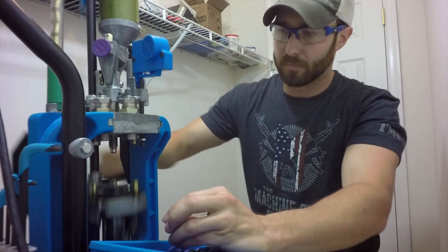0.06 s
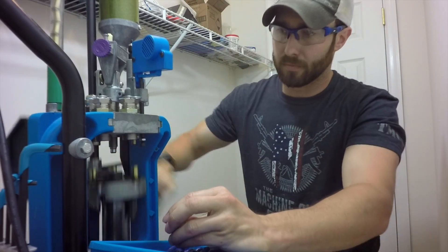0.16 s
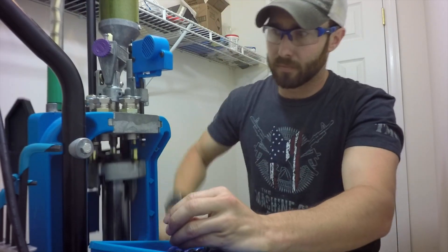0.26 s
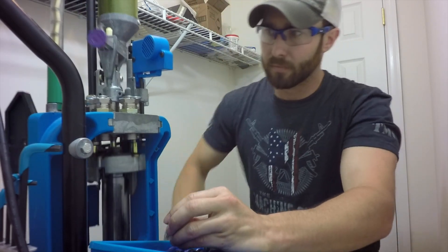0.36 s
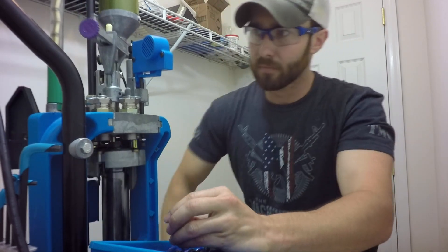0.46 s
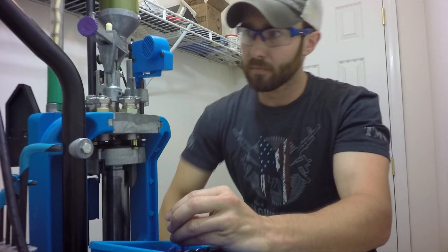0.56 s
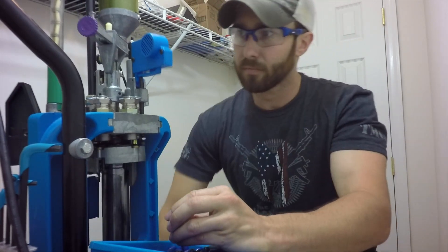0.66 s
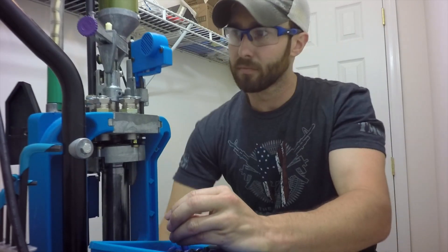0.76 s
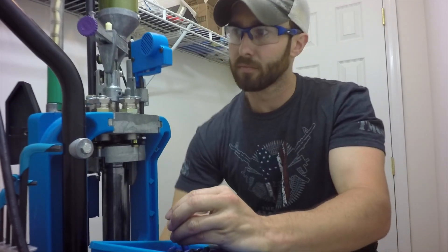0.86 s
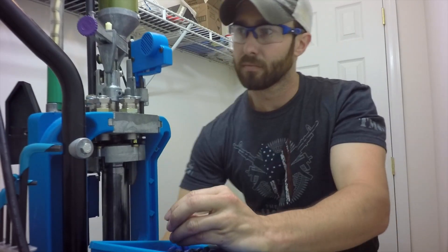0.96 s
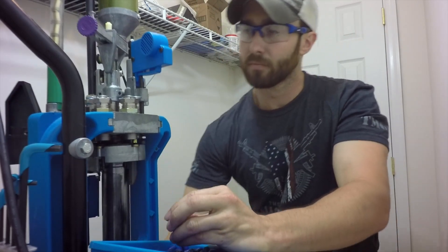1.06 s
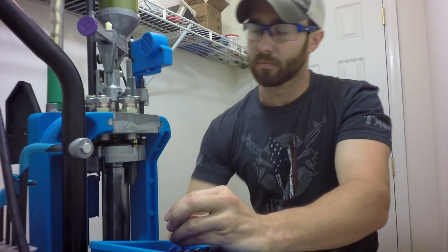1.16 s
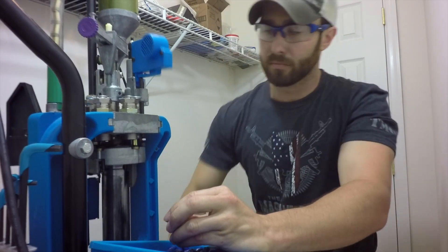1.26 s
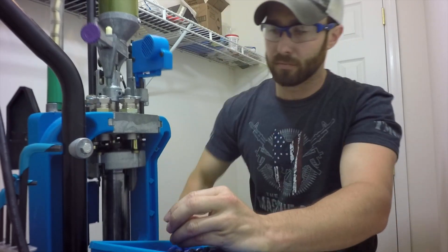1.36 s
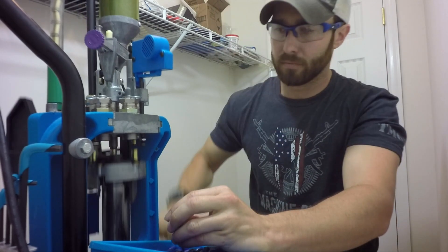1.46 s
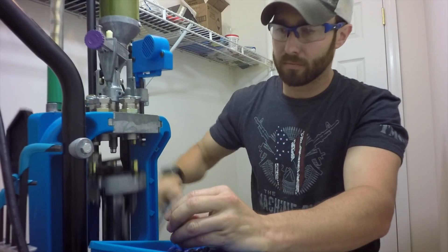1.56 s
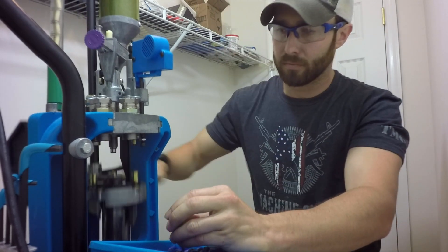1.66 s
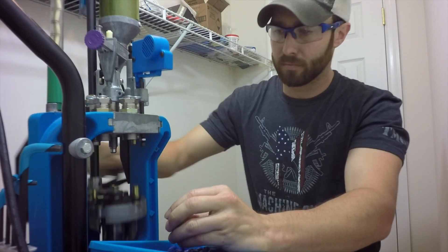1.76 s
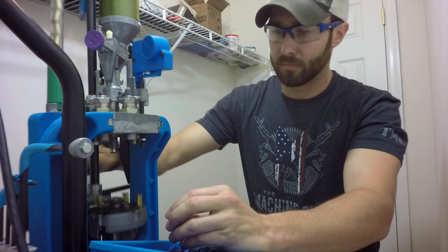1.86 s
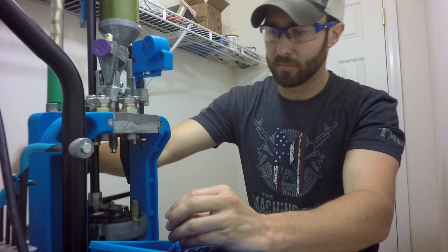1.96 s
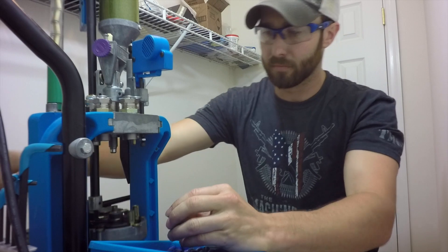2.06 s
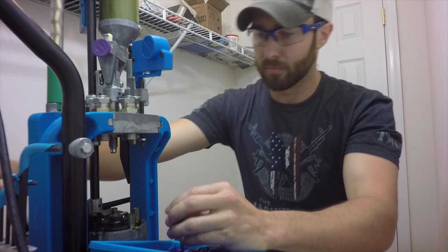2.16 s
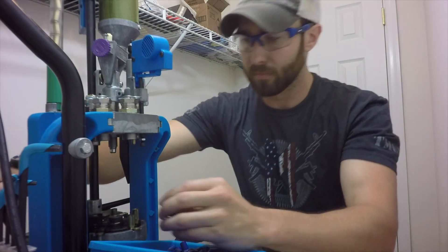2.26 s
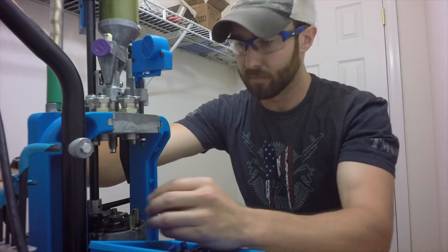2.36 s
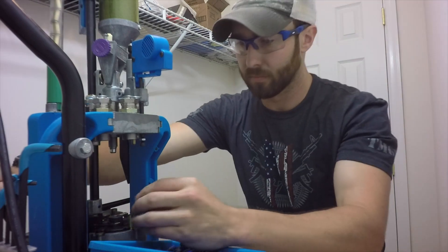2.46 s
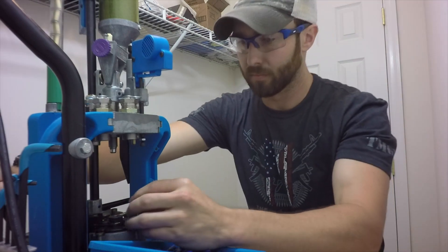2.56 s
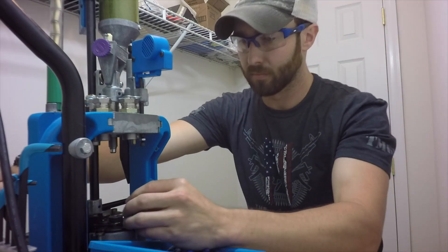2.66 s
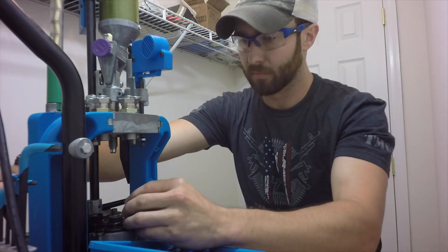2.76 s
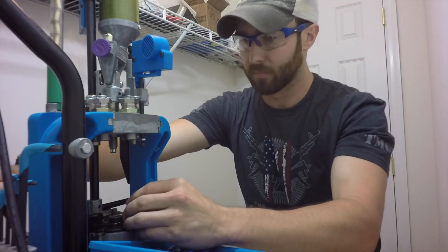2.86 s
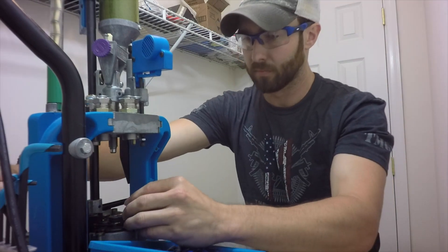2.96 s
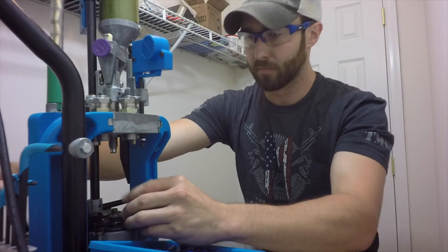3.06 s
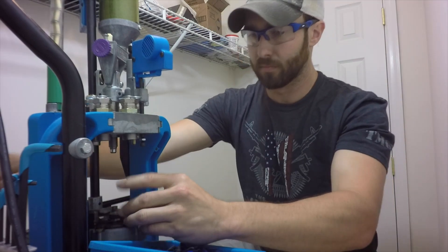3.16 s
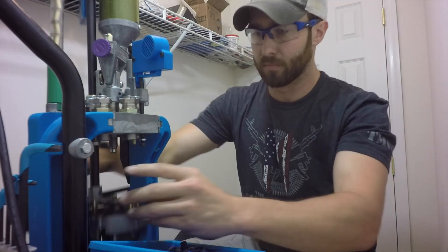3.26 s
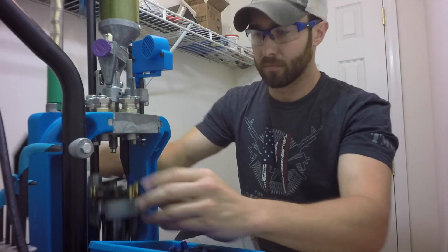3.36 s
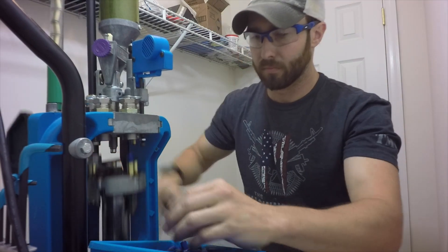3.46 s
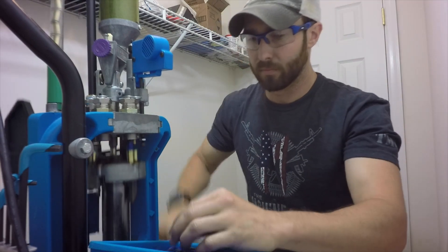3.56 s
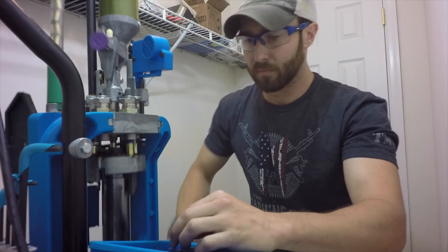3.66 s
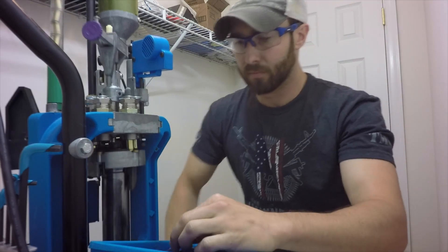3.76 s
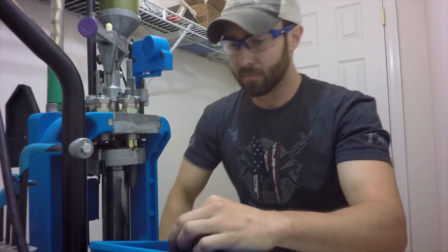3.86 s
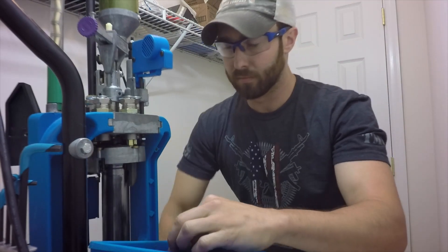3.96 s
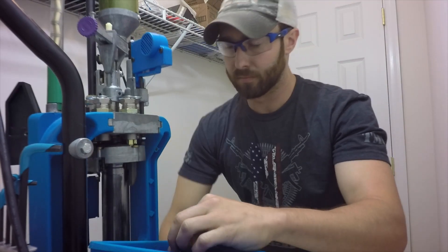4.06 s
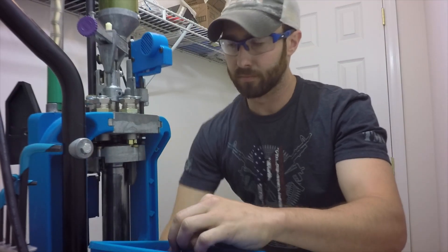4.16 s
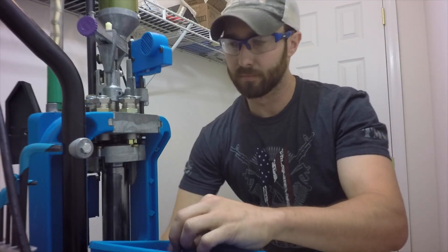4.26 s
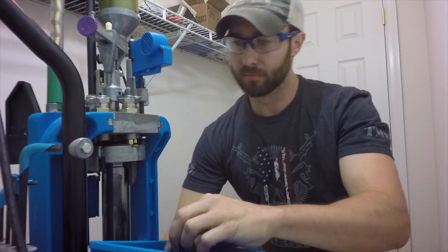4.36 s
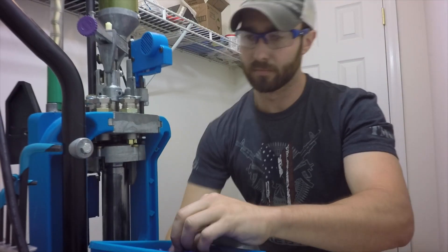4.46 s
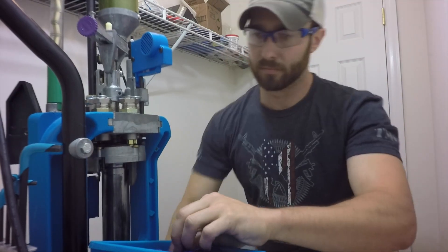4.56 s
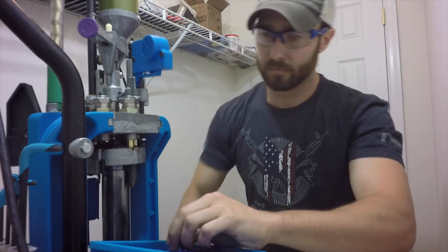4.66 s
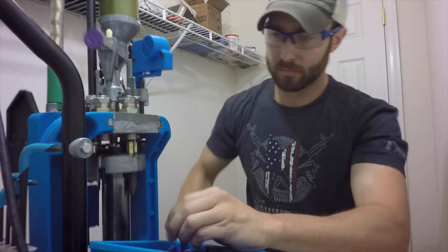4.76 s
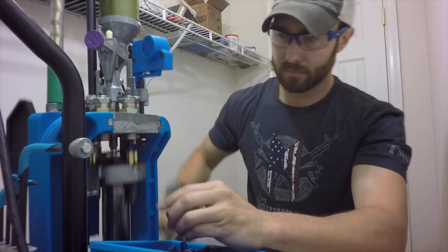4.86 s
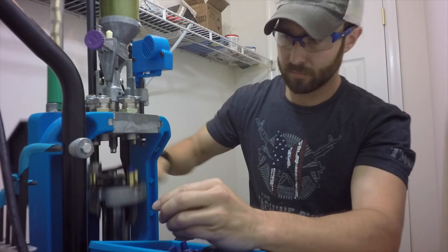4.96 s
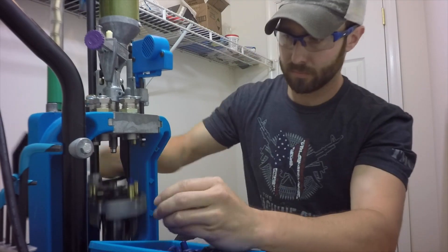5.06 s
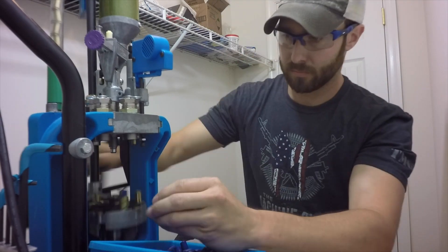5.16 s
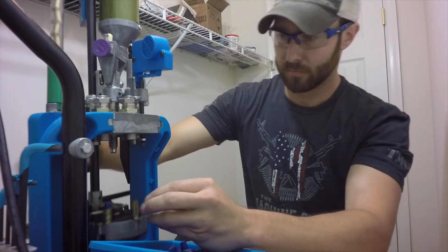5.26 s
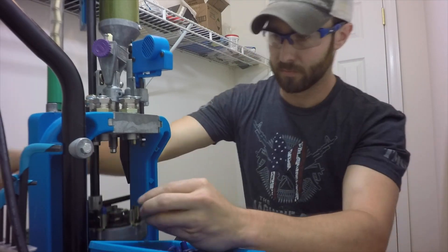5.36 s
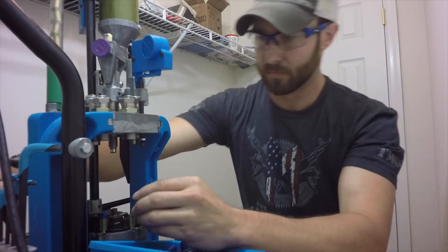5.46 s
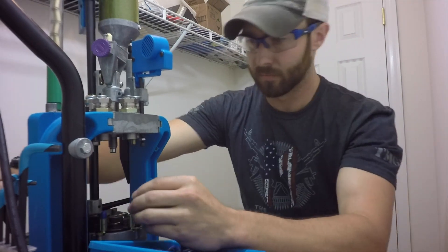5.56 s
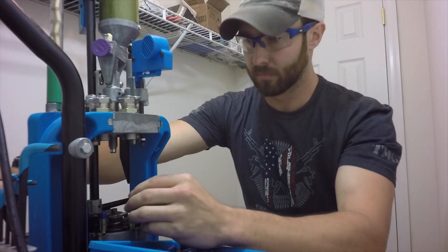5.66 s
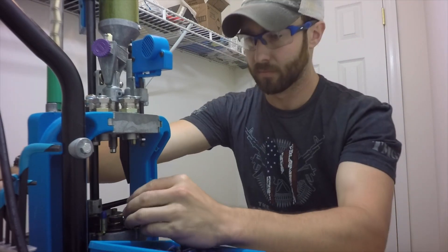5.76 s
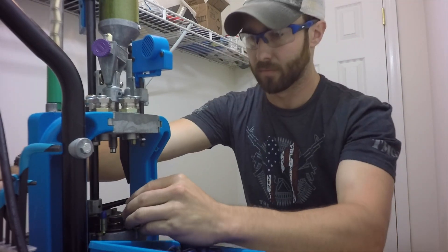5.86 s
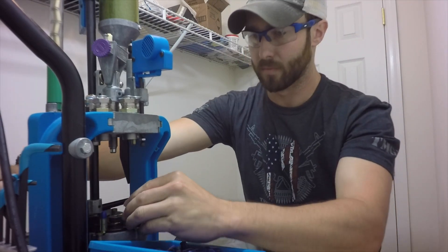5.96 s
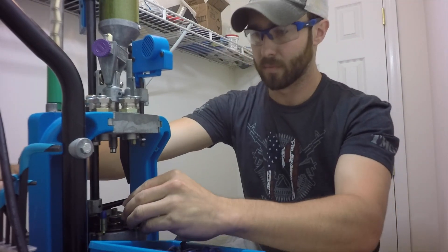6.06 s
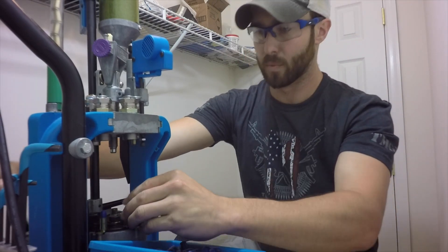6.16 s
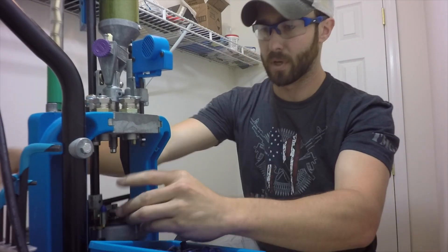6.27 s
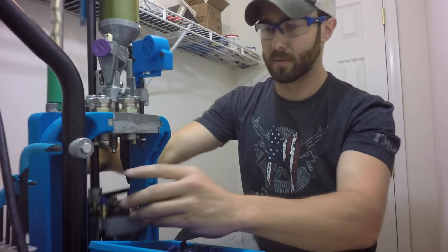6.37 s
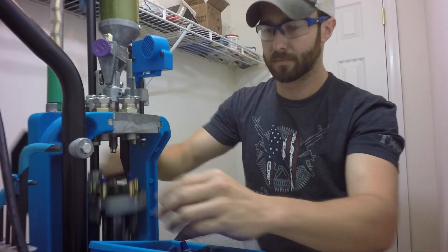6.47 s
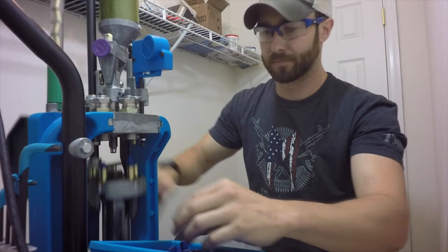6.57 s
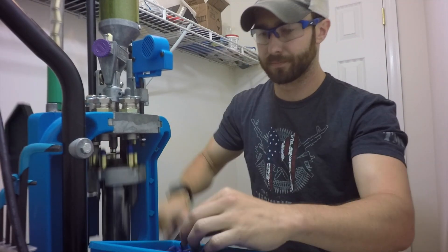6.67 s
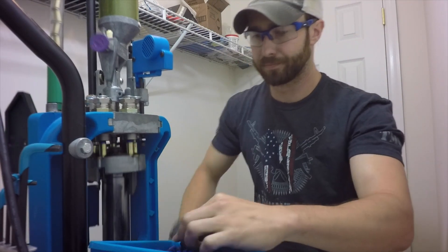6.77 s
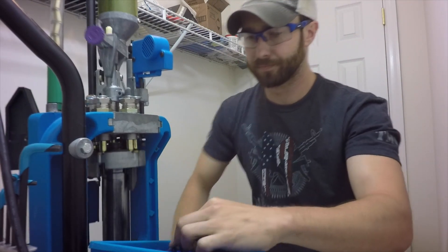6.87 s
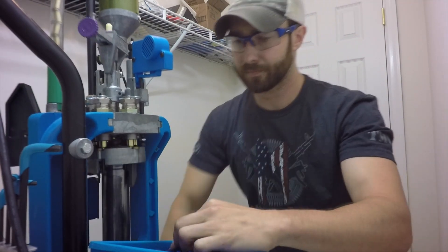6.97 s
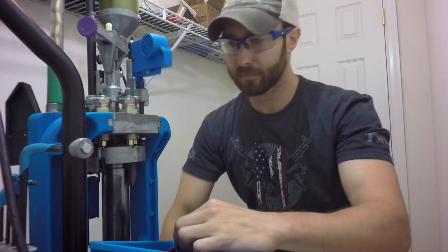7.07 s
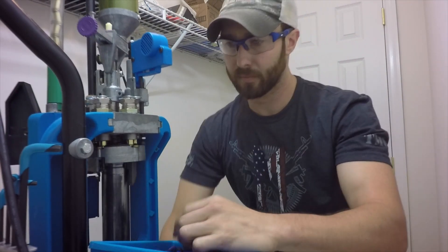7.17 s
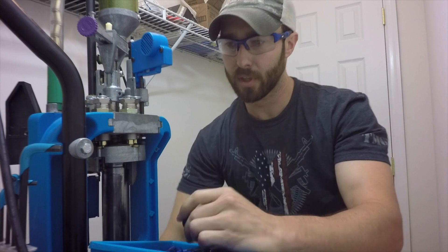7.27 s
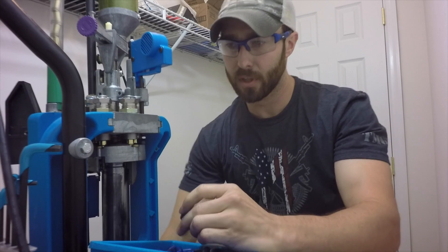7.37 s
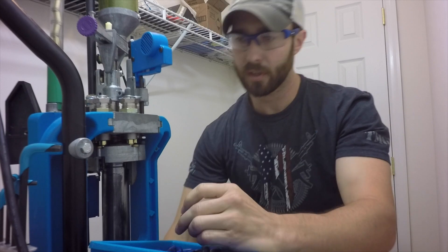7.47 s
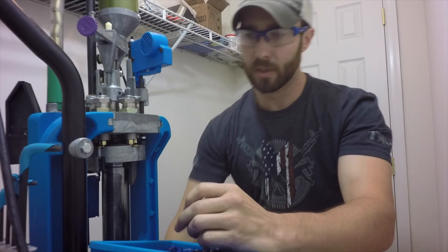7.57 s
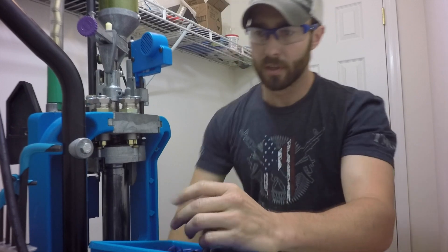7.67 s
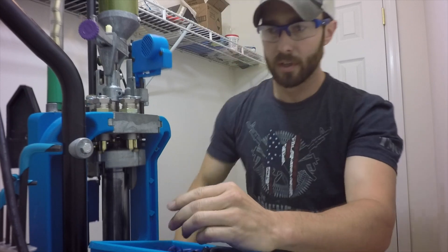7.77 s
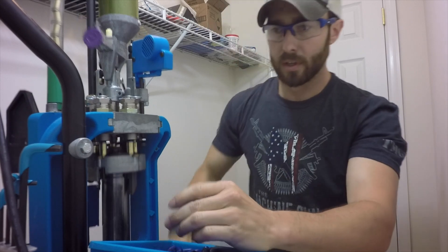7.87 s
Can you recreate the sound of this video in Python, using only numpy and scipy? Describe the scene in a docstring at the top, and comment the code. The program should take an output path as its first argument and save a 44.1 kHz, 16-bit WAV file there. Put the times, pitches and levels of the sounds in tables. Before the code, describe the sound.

Bursts of heavy metallic clunks and bright brass jingles come from a lever press, separated by quiet pauses with faint fingering ticks and background air.

```python
"""In a small room a hand-worked reloading press is cycled on a wooden bench, the microphone standing on the bench.
Each stop, latch and falling case is a blow: steel clacks, the cast frame rings, the bench thuds and sways.
Rings are decaying modes, and blurred clatter is shaped noise. Brass parts ring on in the treble.
Between the blows the ram slides and rattles over faint background air."""
import sys
import numpy as np
from scipy import signal
from scipy.fft import rfft, irfft
from scipy.io import wavfile
from scipy.ndimage import uniform_filter1d

SR = 44100
rng = np.random.default_rng(int(sys.argv[2]) if len(sys.argv) > 2 else 0)


def generate_wav(sig):
    """Save sig (samples, or channels by samples) to the path in sys.argv[1] as 16-bit PCM at SR."""
    pcm = np.round(np.clip(np.atleast_2d(sig).T, -1, 1) * 32767).astype(np.int16)
    wavfile.write(sys.argv[1], SR, pcm)


N = 348371
T = np.arange(SR // 2) / SR  # the half second given to each struck sound (s)

# Spectrum of the press as heard on the bench. Each row: frequency in Hz, relative level in dB per Hz.
PRESS_COLOUR = [(24, -35.5), (40, 14), (117, -6.5), (213, -8.5), (333, -13.5), (509, -3), (637, -10),
                (881, -7.5), (1560, -21.5), (2160, -13.5), (2510, -19), (8110, -26.5), (10400, -36.5),
                (12100, -38), (15500, -38)]


def undb(db):
    """Amplitude factor of a level in dB."""
    return 10 ** (np.asarray(db) / 20)


def unit(x):
    """Scale to rms 1."""
    return x / np.sqrt(np.mean(x ** 2))


def fade(t60):
    """Exponential decay by 60 dB in t60 seconds."""
    return np.exp(-np.log(1000) * T / t60)


def noise(shape, lo_hz, hi_hz, size=N):
    """Noise of a (Hz, dB) spectrum between two soft edges, rms 1."""
    f = np.maximum(np.fft.rfftfreq(size, 1 / SR), 1)
    hz, db = np.transpose(shape)
    edges = 1 / (1 + (lo_hz / f) ** 8) / (1 + (f / hi_hz) ** 8)
    colour = undb(np.interp(np.log(f), np.log(hz), db))
    white = rfft(rng.standard_normal(size))
    return unit(irfft(white * colour * edges, size))


def walk(rate):
    """Random levels drawn every 1 / rate s, with straight slews between them; spread near 1."""
    k = int(SR / rate)
    held = np.repeat(rng.standard_normal(N // k + 1), k)
    return uniform_filter1d(held, k)[:N]


def grit(rate, spread_db, knock_s, steady):
    """Envelope of uneven knocks over a steady part: a few strong among many weak, each dying quickly."""
    size = np.minimum(rng.exponential(size=N), 3)
    knocks = (rng.random(N) < rate / SR) * undb(spread_db * size)
    dying = signal.lfilter([1], [1, -np.exp(-1 / (knock_s * SR))], knocks)
    return unit(dying + steady)


def loose_parts():
    """Each loose part ticks at its own random moments and rings briefly at its own pitch."""
    # Loose parts of the press. Each row: pitch in Hz, t60 in s.
    parts = [(1800, .03), (2200, .025), (2900, .025), (3700, .025), (4300, .02), (5300, .02), (6600, .015),
             (8100, .015)]
    ticks_per_s, tilt_db_per_oct = 45, -7.5
    out = 0
    for hz, t60 in parts:
        ticks = (rng.random(N) < ticks_per_s / SR) * rng.standard_normal(N)
        r = np.exp(-np.log(1000) / (t60 * SR))
        ring = signal.lfilter([1], [1, -2 * r * np.cos(2 * np.pi * hz / SR), r * r], ticks)
        out = out + undb(tilt_db_per_oct * np.log2(hz / parts[0][0])) * unit(ring)
    return unit(out)


def stroke():
    """The pull on the handle rocks the bench; the ram drags and loose parts rattle."""
    # Shoves that start the bench swaying. Each row: time in s, sway in dB, dying in dB per s.
    shoves = [(0.0, -25, 32), (0.33, -28, 20), (0.93, -17.5, 35), (1.3, -24.5, 18), (1.5, -21, 40),
              (1.87, -28.5, 10), (2.3, -27, 60), (3.3, -36, 42), (3.55, -27, 28), (4.27, -23, 18),
              (4.67, -21.5, 8), (5.2, -28, 10), (5.55, -21, 72), (6.3, -34, 10), (6.7, -28, 46),
              (7.05, -26.5, 28), (7.33, -19, 33), (2.0, -26.5, 19.5), (4.85, -26, 88), (7.71, -29, 8)]
    # Each time the ram is moved. Each row: start in s, end in s, then the levels in dB of the
    # bench rumble, frame hum and slide rattle.
    pulls = [(0.0, 0.215, -27.5, -35.5, -38.5), (0.298, 0.51, -22.5, -24.5, -36.5),
             (0.956, 1.162, -34.5, -46, -48), (1.302, 1.597, -22, -26, -40), (1.627, 2.05, -29, -31.5, -38),
             (2.1, 2.36, -31.5, -40.5, -47), (3.282, 3.553, -34, -37.5, -43),
             (3.612, 3.86, -25.5, -29.5, -42), (4.32, 4.45, -35, -33, -40),
             (4.683, 4.947, -26.5, -27.5, -38), (4.998, 5.247, -31, -31, -37.5),
             (5.305, 5.56, -25.5, -31, -40), (6.334, 6.755, -32.5, -35.5, -47.5),
             (6.82, 7.024, -24, -25.5, -35.5), (7.354, 7.46, -43, -38, -40), (7.76, 7.9, -28, -26.5, -36.5)]
    # While the ram stands: rumble, hum and rattle in dB.
    standing_db = [-49.5, -55, -64.5]
    sway_hz, sway_waver_db = 27.3, 2.5
    shove_attack, pull_attack, pull_release = 900, 298, 79  # dB per s
    sway_rest_db, loose_db = -41, -6
    t = np.arange(N) / SR

    at, shove_db, dying = np.transpose(shoves)[:, :, None]
    sway_db = shove_db - shove_attack * np.maximum(at - t, 0) - np.abs(dying) * np.maximum(t - at, 0)
    sway_db = np.maximum(sway_db.max(axis=0), sway_rest_db)
    sway_db = sway_db + sway_waver_db * walk(7.4)
    wandering_hz = sway_hz * (1 + 0.055 * walk(3.0))
    sway = np.sqrt(2) * np.sin(2 * np.pi * np.cumsum(wandering_hz) / SR)

    # each pull rises fast, holds, and dies away after the ram stops
    start, end, *levels = np.transpose(pulls)[:, :, None]
    down_db = pull_attack * np.maximum(start - t, 0) + pull_release * np.maximum(t - end, 0)
    rumble_db, hum_db, rattle_db = (np.maximum((db - down_db).max(axis=0), rest)
                                    for db, rest in zip(levels, standing_db))
    rumble = undb(1 * walk(29)) * noise(PRESS_COLOUR, 59.0, 402)
    hum = undb(3.5 * walk(30)) * noise(PRESS_COLOUR, 380, 1300)
    rattle = grit(120, 1.2, 0.0095, 0.22) * noise(PRESS_COLOUR, 1020, 6000)
    bright = grit(73, 2.1, 0.0018, 1.9) * noise(PRESS_COLOUR, 3800, 16000)
    rattle = rattle + undb(-8.5) * bright + undb(loose_db) * loose_parts()
    return undb(sway_db) * sway + undb(rumble_db) * rumble + undb(hum_db) * hum + undb(rattle_db) * rattle


def background_air():
    """Steady background noise, strongest in the bass."""
    # Spectrum of the background. Each row: frequency in Hz, relative level in dB per Hz.
    air_colour = [(18, -33), (30, -12.5), (140, 10.5), (332, -63), (852, -35.5), (1590, -28.5),
                  (4090, -38.5), (10700, -39), (15500, -50.5)]
    return undb(-46) * noise(air_colour, 25, 16000)


def struck(modes, count, scatter_db, push_s, lean_db=0):
    """One ring per blow, peak 1: each blow shares its force differently among the modes."""
    hz, db, t60 = np.transpose(modes)[:, :, None]
    decay = np.log(1000) * T / np.clip(t60, .03, 1)
    bank = np.exp(2j * np.pi * hz * T - decay) * undb(db)
    chance = rng.standard_normal((count, len(modes), 2))
    share = undb(scatter_db * chance[..., 0] + lean_db) * np.exp(.6j * chance[..., 1])
    rings = (share @ bank).imag
    rings = rings * (1 - np.exp(-T / push_s))  # a soft contact builds the ring up
    return rings / np.abs(rings).max(axis=1, keepdims=True)


def clinks(hz, spread, t60):
    """The small part that is hit rings on a few close, beating modes around its own pitch."""
    chance = rng.standard_normal((len(hz), 4, 2))
    pitch = np.minimum(hz[:, None] * (1 + spread * chance[..., 0]), .4 * SR)[..., None]
    modes = np.sin(2 * np.pi * pitch * T + chance[..., 1:]).sum(axis=1)
    return modes * fade(t60) * (1 - np.exp(-T / 0.00031)) / 3


def bursts(lo_hz, hi_hz, count, crack_t60, tail_t60, tail_db, push_s, chatter=1):
    """Modes too dense to tell apart: a crack and a longer tail of rebounds, a random stretch per blow."""
    dense = noise(PRESS_COLOUR, lo_hz, hi_hz)
    span = rng.integers(0, N - len(T), count)[:, None] + np.arange(len(T))
    tail = undb(tail_db) * fade(tail_t60) * (chatter * np.ones(N))[span]
    return dense[span] * (fade(crack_t60) + tail) * (1 - np.exp(-T / push_s)) / 2


def place(times, db, sounds):
    """Lay each sound at its time and level."""
    out = np.zeros(N + len(T))
    for s, gain, sound in zip(times, undb(db), sounds):
        i = int(s * SR)
        out[i:i + len(T)] += gain * sound
    return out[:N]


def strike_list(events, table):
    """Each event's time and levels, followed by the row of its contact."""
    return np.transpose([(s, *levels, *table[name]) for s, name, *levels in events])


def blows():
    """Steel and frame reach the microphone by air, the thud through the bench."""
    # Every blow. Each row: time in s, contact, strength in dB, extra steel in dB.
    hits = [(0.1181, "case seats", 2.5, 2.5), (0.2057, "cam", 5, 7.5), (0.2627, "cam", 0.5, 12),
            (0.3328, "die entry", 2.5, 0.5), (0.3584, "sizing", 0, -1), (0.4003, "rebound", -0.5, 4.5),
            (0.4583, "die entry", -10, 5), (0.4708, "slide bar", 1, -2), (0.5577, "ram top", 1.5, -1.5),
            (0.6618, "rebound", -4.5, 4), (0.9229, "handle stop", 2.5, -1),
            (0.9387, "handle bounce", 3.5, 2), (1.0163, "handle settles", 6.5, -1),
            (1.076, "handle settles", -16, 8), (1.237, "slack", -6.5, 0), (1.275, "pull free", 1.5, -4.5),
            (1.3472, "latch", 6.5, -1.5), (1.479, "die entry", 7, -3), (1.4946, "bar returns", -2.5, 1.5),
            (1.5492, "bar stop", 1.5, 1.5), (1.6794, "index", -2, 5), (1.728, "detent", -1.5, 10.5),
            (1.8554, "case drops", 0, -6.5), (1.943, "spring", -4, 6), (1.9815, "ram bottom", -1.5, 3),
            (2.0073, "plate lands", -2, 5), (2.105, "case rattles", 4.5, -2.5), (2.183, "cam", 1, -14),
            (2.2036, "pin", -5, 4.5), (2.2633, "tap", -3, 4.5), (2.3282, "rest", -4.5, -7),
            (2.548, "fingers", -0.5, -2.5), (2.63, "fingers", 0.5, 2), (2.731, "hand shifts", -11.5, 12),
            (2.8825, "case tinkles", 1, -1), (3.088, "fingers", -1.5, -16),
            (3.1307, "hand shifts", -7, 19.5), (3.2587, "take-up", -2.5, -0.5), (3.2874, "link", -1, -9),
            (3.3558, "link", 3.5, 2), (3.4269, "case seats", 3, -1.5), (3.5167, "cam", 2, 5.5),
            (3.5727, "cam", -4, 13), (3.6413, "die entry", -3, 2), (3.676, "sizing", 1.5, -2.5),
            (3.7397, "rebound", -4.5, 7), (3.7753, "slide bar", 5.5, -8.5), (3.8854, "ram top", 0, 1.5),
            (3.9651, "rebound", -5.5, 4.5), (4.0919, "pin pings", 2.5, -1),
            (4.2626, "handle stop", 1.5, -3), (4.2763, "handle bounce", -3.5, -0.5),
            (4.3206, "handle settles", 2, -0.5), (4.3882, "handle settles", -11, 11),
            (4.581, "fingers", 4, -3), (4.6094, "slack", 1.5, -0.5), (4.6365, "pull free", -1, 1),
            (4.6964, "latch", 0, 4), (4.7782, "cam", 6, -1), (4.8627, "bar returns", 0.5, -2),
            (4.9167, "bar stop", -4.5, 4.5), (5.034, "index", 0.5, 1), (5.0682, "detent", 2.5, 1),
            (5.1892, "case drops", -0.5, -4), (5.2682, "spring", -3, -2.5), (5.3059, "ram bottom", 3, -2),
            (5.333, "plate lands", 1.5, -1), (5.4165, "case rattles", -6.5, 5), (5.4886, "pin", 6.5, -1.5),
            (5.5326, "push", 1, 2), (5.5854, "rest", -6, -4), (5.7107, "fingers", 4.5, -2.5),
            (5.8693, "fingers", 2.5, 2.5), (6.0513, "fingers", 3.5, 6), (6.2195, "hand shifts", 6, -2),
            (6.3489, "take-up", 4, -6.5), (6.3799, "link", 1.5, 7.5), (6.4575, "link", -7, 14),
            (6.5315, "case seats", -3.5, 5), (6.6232, "cam", 0, 8.5), (6.6813, "cam", -4.5, 13.5),
            (6.757, "die entry", -1, 1), (6.778, "die entry", -2.5, 0.5), (6.8132, "sizing", 0, -7.5),
            (6.8964, "slide bar", 3, 1.5), (6.9593, "take-up", 7, -10), (6.9695, "ram top", 0.5, 0),
            (7.0754, "rebound", -7, 3.5), (7.259, "case tinkles", -16, 11.5),
            (7.3204, "handle stop", 0.5, 11), (7.399, "latch", -8.5, 11),
            (7.4794, "handle settles", -4.5, -6), (7.5772, "cam", -12, -9), (7.64, "fingers", 12, -5),
            (7.667, "slack", 0, 1.5), (7.7068, "pull free", -2, 0), (7.7545, "push", 11.5, -8)]
    # What each contact sets going, before the strength is added: clack, bright tick, frame and
    # bench thud in dB, clack pitch in Hz, grip damping in dB per 0.1 s (negative rings longer).
    contacts = {"take-up": (-31.5, -21.5, -24, -23, 10010, 1), "link": (-37.5, -56, -40.5, -35, 1300, 10),
                "case seats": (-18, -16.5, -25.5, -29, 3707, 13), "cam": (-29.5, -46, -21.5, -21, 2130, 6),
                "die entry": (-18.5, -21.5, -19, -34, 2017, -4), "sizing": (-4.5, -24, -4, -21, 2185, 13.5),
                "rebound": (-20.5, -29.5, -13, -31.5, 3055, -4),
                "slide bar": (-17.5, -17.5, -7.5, -17.5, 2809, 25),
                "ram top": (-1.5, -15.5, -0.5, -17, 2200, 12.5),
                "handle stop": (-39, -46.5, -21, -8.5, 856, 0),
                "handle bounce": (-16.5, -27, -20.5, -19, 2886, -6.5),
                "handle settles": (-19.5, -64, -20, -40.5, 1814, -5),
                "slack": (-23.5, -40.5, -20, -23, 2320, -4.5), "pull free": (-10, -26.5, -3, -8, 2229, 6),
                "latch": (-16, -22.5, -17.5, -15.5, 3430, -3),
                "bar returns": (-8, -10.5, -5.5, -13, 1934, 5), "bar stop": (-7, -15.5, -10, -10, 2100, 7),
                "index": (-8, -9.5, -7, -41, 3647.5, -5), "detent": (-16.5, -25, -33.5, -45, 2240, 11),
                "case drops": (-20, -13, -19, -19.5, 3929, -5.5), "spring": (-40, -21, -21, -21, 3900, 1),
                "ram bottom": (-16, -15, -6, -6, 2070, 17.5),
                "plate lands": (-22, -15.5, -14, -8.5, 2300, 16), "pin": (-17, -24, -31.5, -25, 2314, 19),
                "push": (-27.5, -50, -21.5, -16, 2000, 11), "rest": (-10, -25, -10.5, -19, 1866, 8.5),
                "fingers": (-34.5, -45.5, -43, -51, 2100, -3),
                "case tinkles": (-36.5, -32, -39, -50, 2198, 7),
                "pin pings": (-39, -47, -37, -54.5, 4100, -12),
                "hand shifts": (-55, -52.5, -44, -41, 5800, 0), "tap": (-21.5, -50, -16, -18, 1529.5, 59),
                "case rattles": (-32, -18, -24.5, -27, 3950, -1.5)}
    # Modes of the steel parts. Each row: Hz, relative dB, t60 in s (never under 0.03 s as struck).
    steel_modes = [(1910, 11, 0.44), (2058, -22.5, 0.088), (2137, -2, 0.058), (2277, -26, 0.034),
                   (2426, -7.5, 0.028), (2794, 14, 0.22), (3600, 10.5, 0.072), (3650, 14, 0.15)]
    # Modes of the cast frame. Each row: Hz, relative dB, t60 in s.
    frame_modes = [(417, -3.5, 0.063), (458.4, 2, 0.17), (498.7, -6.5, 0.18), (505, -5, 0.18),
                   (588, -1.5, 0.16), (653, -1, 0.17), (698.5, -10, 0.2), (870, -3, 0.26),
                   (891, -12.5, 0.42), (912, -13, 0.19), (931, -6.5, .12), (970, -5.5, 0.21),
                   (1087, -17, 0.32), (1205, -26.5, 0.055)]
    # Modes of the wooden bench. Each row: Hz, relative dB, t60 in s.
    bench_modes = [(77.5, -11, 0.7), (119.6, -11, 0.33), (161.6, -2, 0.21), (209.8, 1, 0.19),
                   (273.2, -7, 0.38), (298, -0.5, 0.1)]
    favoured_hz = 170
    steel_scatter_db, frame_scatter_db = 8, 5

    columns = strike_list(hits, contacts)
    s, db, steel_db, clack_db, tick_db, frame_db, thud_db, clack_hz, grip_db = columns
    clack_db, tick_db = clack_db + db + steel_db, tick_db + db + steel_db
    frame_db, thud_db = frame_db + db, thud_db + db
    n = len(s)

    clack = undb(-14.5) * struck(steel_modes, n, steel_scatter_db, 0.00037)
    clack = clack + undb(-6) * clinks(clack_hz, .02, 0.076)
    clack_chatter = grit(90, 0.8, 0.0053, 2.5)
    clack = clack + undb(-5) * bursts(833, 4700, n, 0.0095, 0.27, -0.97, 0.00014, clack_chatter)
    tick_chatter = grit(83, 3.6, 0.0097, 0.81)
    tick = undb(1.0) * bursts(3300, 21000, n, 0.0033, 0.25, -2.5, 0.000097, tick_chatter)
    # neighbouring pins, springs and cases are shaken too, each time different ones
    clack = clack + undb(-15) * clinks(np.full(n, 3200.), .3, .12)
    tick = tick + undb(-11) * clinks(np.full(n, 8500.), .3, .07)

    frame = undb(1.0) * struck(frame_modes, n, frame_scatter_db, 0.0015)
    frame_chatter = grit(54, 1.4, 0.0093, 0.52)
    frame = frame + undb(-1.5) * bursts(455, 1220, n, 0.06, 0.55, -5.5, 0.0021, frame_chatter)

    # a blow that goes more into the bench than the frame favours the bench modes near 170 Hz
    octaves_off = np.abs(np.log2(np.array(bench_modes)[:, 0] / favoured_hz))
    lean_db = -2.5 * np.clip(thud_db - frame_db, 0, 15)[:, None] * octaves_off
    thud = undb(1.5) * struck(bench_modes, n, 3.34, 0.0032, lean_db)
    thud = thud + bursts(52, 560, n, 0.079, 0.33, -1.9, 0.0091)

    # parts that stay pressed together after the blow damp the ring
    grip = undb(-np.clip(grip_db, -9, 60)[:, None] * 10 * T)
    grip = grip * np.cos(np.pi * T)  # every ring has died after half a second
    layers = ((clack_db, clack), (tick_db, tick), (frame_db, frame))
    by_air = sum(place(s, level_db, grip * sound) for level_db, sound in layers)
    return by_air, place(s, thud_db, grip * thud)


def brass():
    """A close pair that beats, its overtone, a thin long ring and the plate; loose seats make them chatter."""
    # Blows that set brass ringing. Each row: time in s, contact, strength in dB.
    jingles = [(0.121, "case seats", 1.5), (0.4705, "slide bar", -5.5), (1.3476, "latch", 9.5),
               (1.492, "bar returns", 2.5), (1.5527, "bar stop", -1.5), (1.681, "index", 0),
               (1.728, "detent", 8), (1.8592, "case drops", 3), (2.0063, "plate lands", 4.5),
               (2.1057, "bar returns", -16), (2.2064, "pin", -7.5), (3.425, "case seats", 2),
               (3.6384, "slide bar", -2.5), (3.7754, "slide bar", -1.5), (4.6947, "latch", 4),
               (4.8605, "bar returns", -3), (4.9177, "bar stop", -4.5), (5.035, "index", 9),
               (5.1856, "case drops", -0.5), (5.3343, "plate lands", -0.5), (5.4894, "pin", 0),
               (6.53, "case seats", -3.5), (6.8977, "slide bar", -10), (7.3991, "latch", 4),
               (7.8494, "latch", -14), (4.32, "latch", -8)]
    # What each contact sets ringing, in relative dB. Each row: contact, low pair of the case,
    # overtone of the case, thin pin, plate.
    ring_levels = [("case seats", -12, -19.5, -45, -51), ("slide bar", -26, -52, -44, -16),
                   ("latch", -31.5, -37, -46, -33), ("bar returns", -20, -28, -25.5, -16),
                   ("bar stop", -13, -33, -48.5, -16), ("index", -46, -32.5, -43.5, -35.5),
                   ("detent", -34, -37, -37, -24), ("case drops", -21.5, -27.5, -27, -27),
                   ("plate lands", -23, -48, -48, -10), ("pin", -28, -38, -46, -55)]
    # The close pair of the case and its neighbours. Each row: Hz, relative dB, t60 in s.
    case_pair = [(5565, 0, .22), (5654, 0, .22), (5760, -4, .14), (5450, -5, .14), (5880, -7, .1)]
    # The overtone of the case. Each row: Hz, relative dB, t60 in s.
    case_top = [(11830, 0, .16), (11720, -5, .1), (11940, -6, .1)]
    # The thin pin. Each row: Hz, relative dB, t60 in s.
    pin = [(12140, 0, .4), (12240, -4, .2)]
    # The plate. Each row: Hz, relative dB, t60 in s.
    plate = [(7450, -3, .1), (7700, -3, .1), (7950, -2, .1), (8150, 0, .12), (8400, -1, .1),
             (8650, -4, .08)]
    s, strength_db, *levels = strike_list(jingles, {row[0]: row[1:] for row in ring_levels})
    out = 0
    for db, modes in zip(levels, (case_pair, case_top, pin, plate)):
        ring = place(s, db + strength_db, struck(modes, len(s), 3.1, 0.00037))
        out = out + undb(6 * walk(400)) * ring  # chatter
    return undb(-4) * out


def pings():
    """Pins and cases that ring out alone, each on a few close modes."""
    # Small parts left free to ring. Each row: time in s, level in dB, pitch in Hz, t60 in s,
    # pitch spread as a fraction of the pitch.
    ping_list = [(0.4583, -17, 3760, 0.071, 0.02), (0.939, -19, 5210, 0.17, 0.04),
                 (1.021, -22.5, 1770, 0.22, 0.01), (1.238, -38, 3400, .15, .012),
                 (2.2645, -20, 1420, 0.044, 0.14), (2.631, -35, 1850, 0.14, .01),
                 (2.883, -35, 4100, 0.16, 0.06), (3.145, -45, 5700, 0.23, 0),
                 (4.092, -49.5, 3480, .4, .005), (4.352, -35, 4220, 0.19, .012),
                 (4.35, -40, 5800, .3, 0.03), (6.0514, -32, 2340, 0.086, 0), (6.22, -46, 5800, .15, .02)]
    s, db, hz, t60, spread = np.transpose(ping_list)
    return place(s, db, clinks(hz, spread[:, None], t60[:, None]))


def room(x):
    """A small room: diffuse echoes from 4 ms on, the treble lingering longer than the low band."""
    low_t60_s, echo_db = 0.21, -13
    tilt = [(100, 15.5), (16000, -18.0)]  # (Hz, relative dB)
    low = noise(tilt, 150, 1200, size=len(T))
    high = noise(tilt, 3000, 32000, size=len(T))
    echo = (low * fade(low_t60_s) + high * fade(2.23 * low_t60_s)) * (T > .004)
    echo = echo / np.sqrt(np.sum(echo ** 2))
    return x + undb(echo_db) * signal.fftconvolve(x, echo)[:N]


def scene():
    """The press by air with its room echoes, the bench directly, and the background air."""
    # The level dips briefly: time in s, half width in s, depth in dB.
    brief_dip = (2.241, .006, -16)
    by_air, by_bench = blows()
    in_room = room(by_air + brass() + pings())
    at, half, dip_db = brief_dip
    dip = undb(dip_db * np.exp(-((np.arange(N) / SR - at) / half) ** 2))
    return (dip * (in_room + by_bench + stroke() + background_air()))[None]


def record(dry):
    """The recorder rounds the loudest peaks and cuts the top."""
    top_hz = 15300
    rounded = np.tanh(0.9 * dry) / 1.018
    return signal.sosfilt(signal.ellip(10, .2, 70, top_hz, fs=SR, output="sos"), rounded)


dry = scene()
out = record(dry)
generate_wav(out)
```